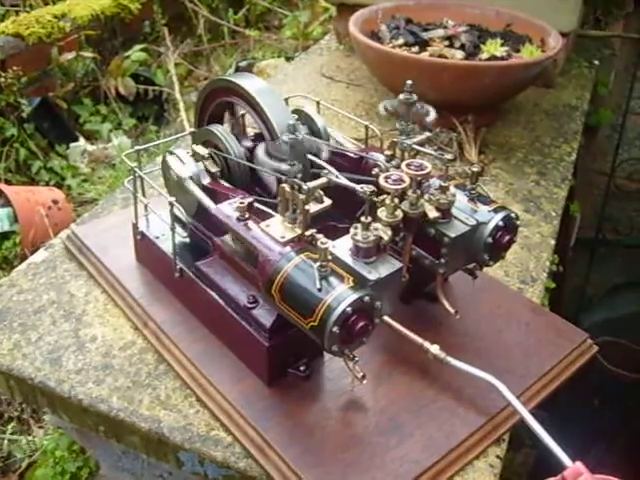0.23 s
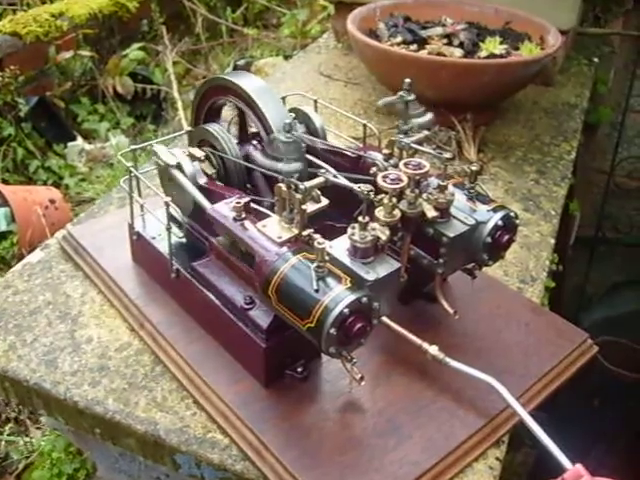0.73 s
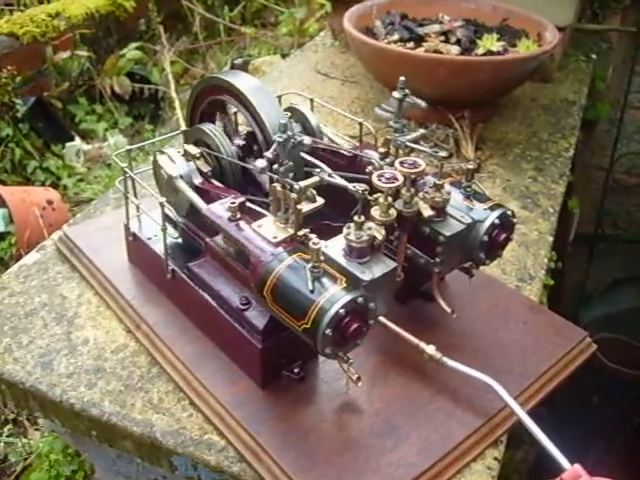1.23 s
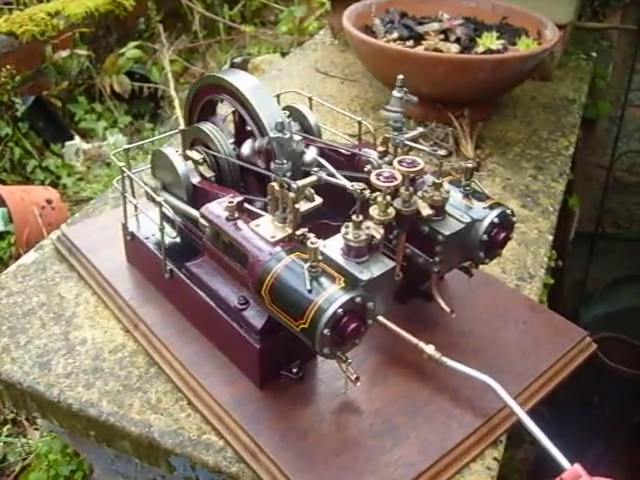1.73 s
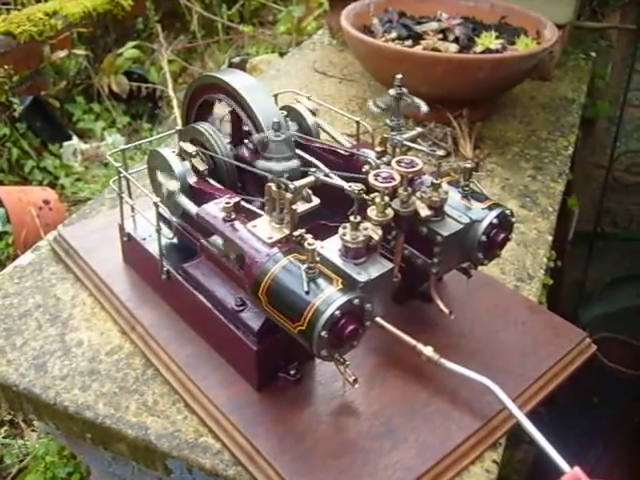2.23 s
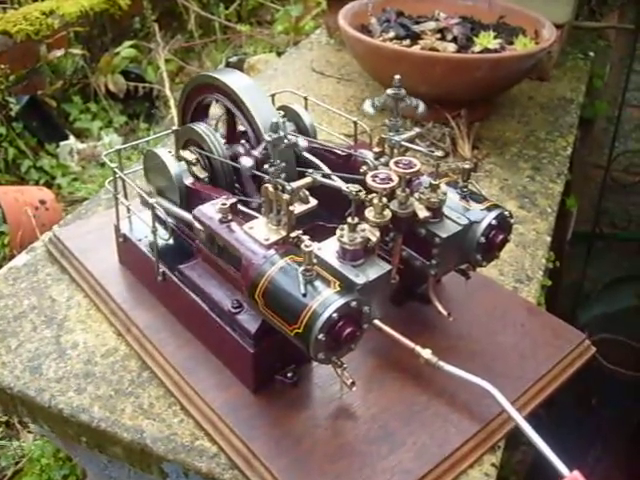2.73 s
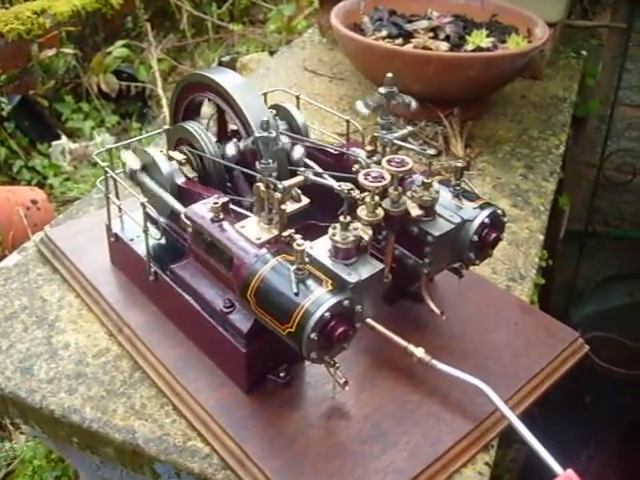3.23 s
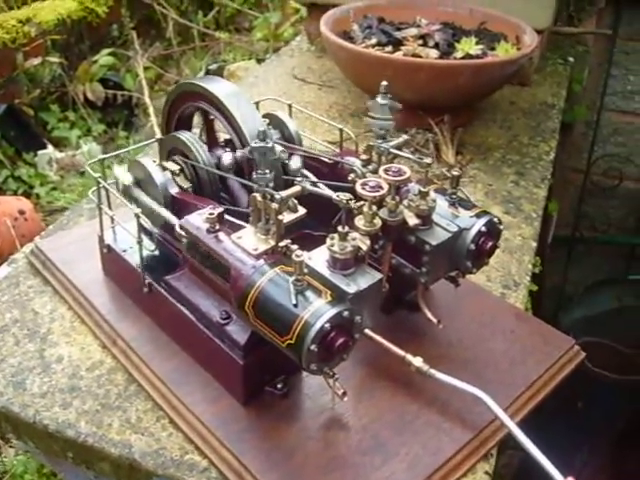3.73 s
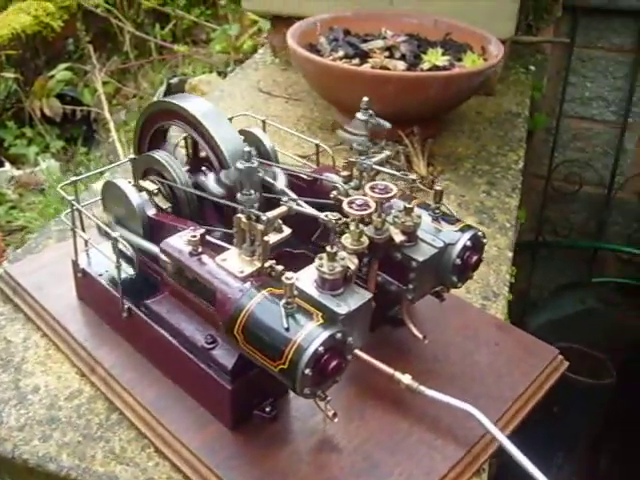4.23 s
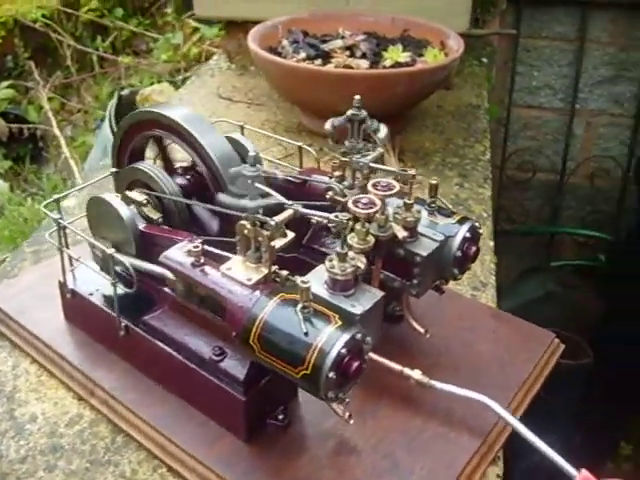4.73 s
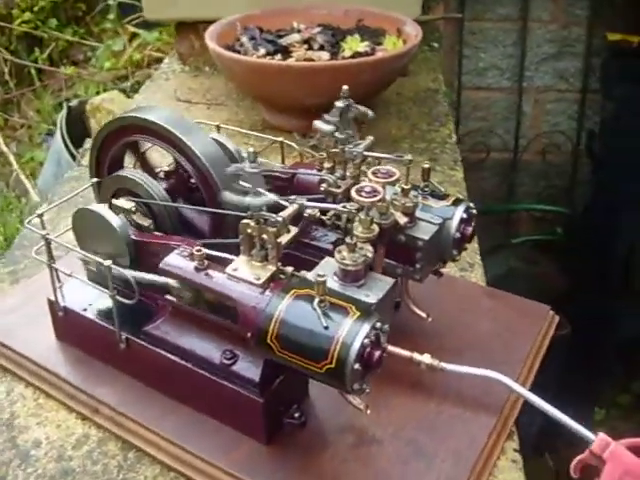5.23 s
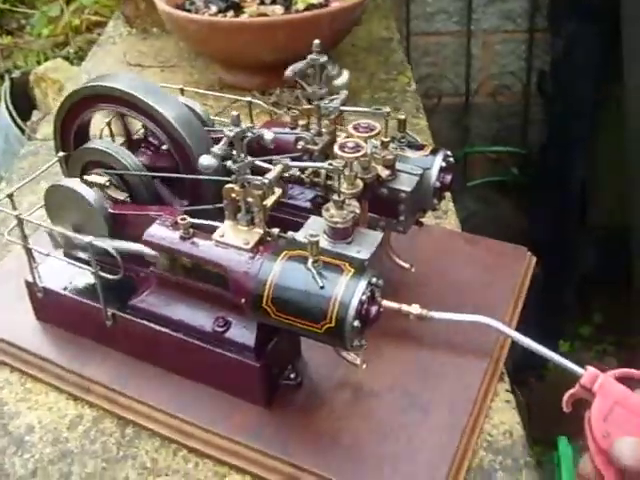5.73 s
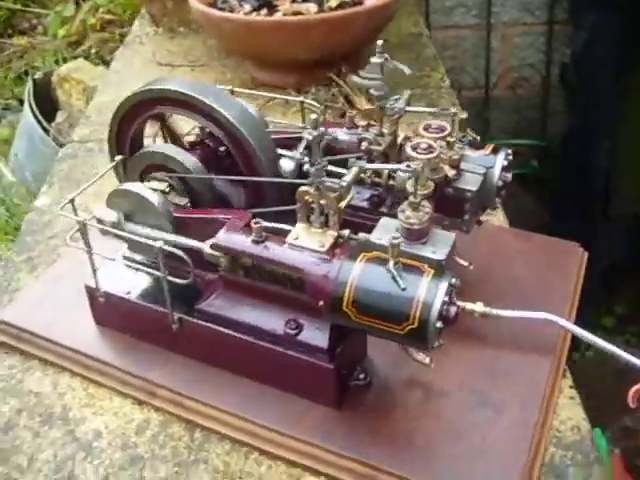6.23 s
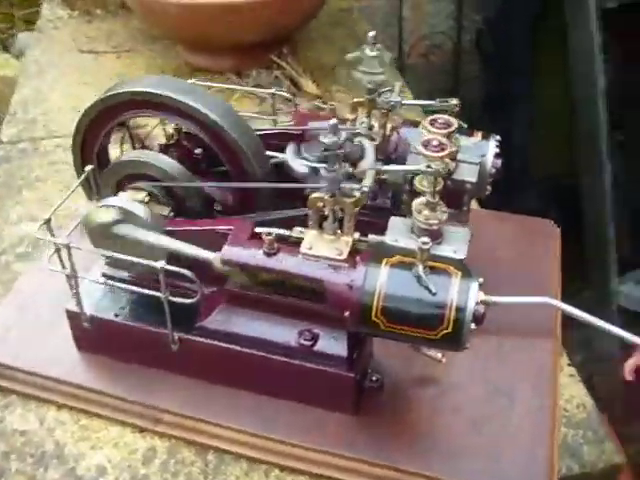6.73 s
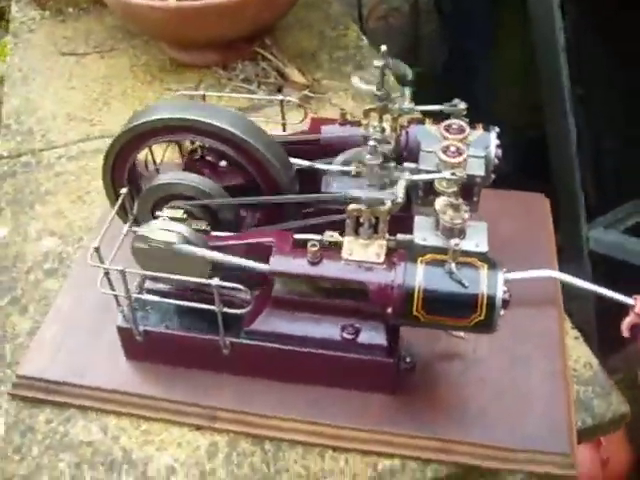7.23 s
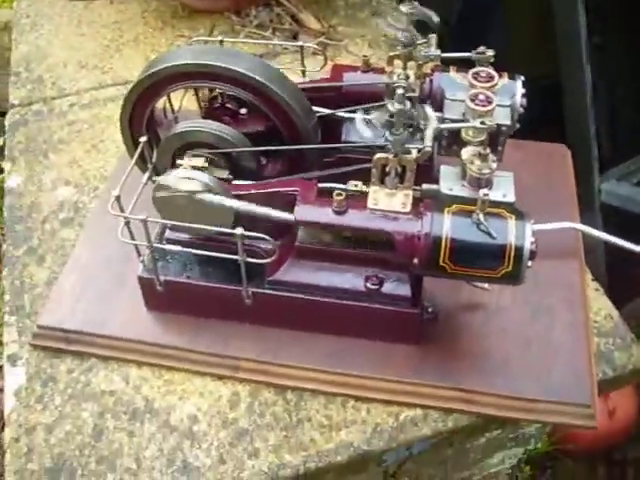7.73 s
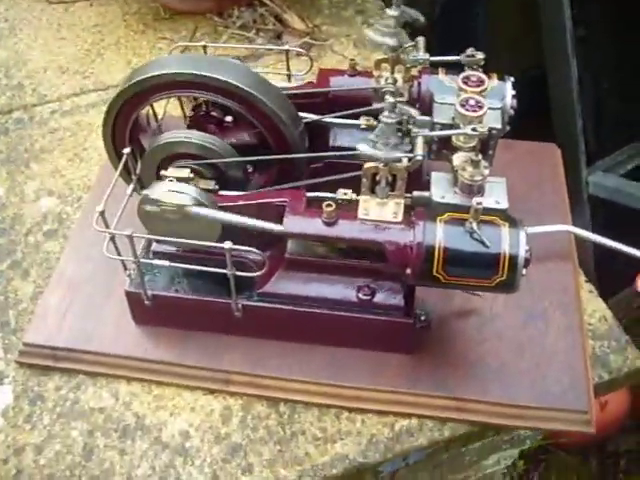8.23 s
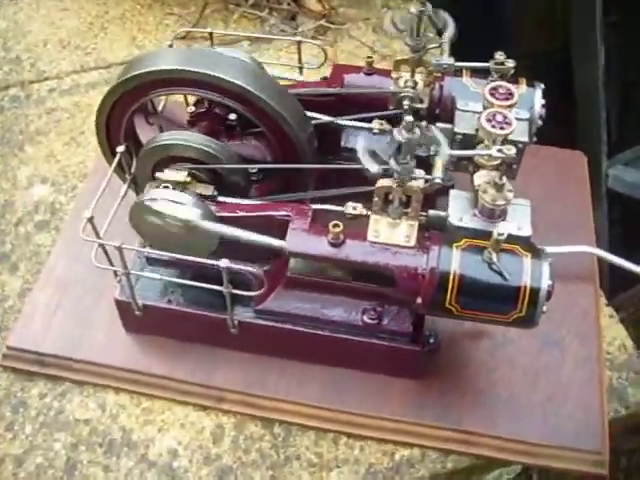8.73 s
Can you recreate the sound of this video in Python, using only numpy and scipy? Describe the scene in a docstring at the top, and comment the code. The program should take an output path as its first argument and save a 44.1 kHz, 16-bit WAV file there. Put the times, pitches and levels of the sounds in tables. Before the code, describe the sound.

Constant bright air leak and a fast, even, mechanical chuff in a garden. Puffs alternate strong and weak, mixed with clacks, small thuds and ticking knocks, all very short and dry. The beat sags to about five a second near two seconds, then picks up. A faint low drone swells midway. From six seconds, heard from the side, the clacks are duller and the hiss less piercing.

```python
"""A twin-cylinder model steam engine runs on compressed air on a garden slab, about six turns a second.
Soft outdoor rumble and leaking air, both shaped noise, are there from the start. Turn after turn, we hear a puff,
a thud, a knock with a steel tick, two faint thuds, then a bigger puff with a sharp clack: blows ring sines.
The engine slows after a second and recovers; a low drone, a plain sine, swells between three and five seconds.
From about six seconds the microphone is mostly round at the side, no longer facing the cylinder ends."""
import sys
import numpy as np
from scipy import signal
from scipy.fft import rfft, irfft, next_fast_len
from scipy.io import wavfile

SR = 44100
rng = np.random.default_rng(int(sys.argv[2]) if len(sys.argv) > 2 else 0)


def master(y):
    """Save y as 16-bit WAV."""
    cut = np.clip(np.atleast_2d(y).T, -1, 1)
    pcm = np.round(cut * 32767)  # scale
    wavfile.write(sys.argv[1], SR, pcm.astype(np.int16))


N = 396459
TIME = np.arange(N) / SR


def from_db(db):
    """Decibels to gain."""
    return 10 ** (np.asarray(db) / 20)


def in_time(rows):
    """Each column of a table of moments, read at every sample."""
    seconds, *columns = np.transpose(rows)
    return [np.interp(TIME, seconds, column) for column in columns]


def over_turn(rows, angle):
    """Each column of a one-turn table, read at the given crank angles."""
    share, *columns = np.transpose(rows)
    return [np.interp(angle, share, column) for column in columns]


def coloured(hz, level_db):
    """Noise with the given loudness in dB per Hz, fading below the lowest pitch listed."""
    size = next_fast_len(N, True)
    bins = np.maximum(np.arange(size // 2 + 1) * SR / size, 1)
    gain = from_db(np.interp(np.log(bins), np.log(hz), level_db))
    gain *= np.minimum(bins / hz[0], 1) ** 2
    noise = irfft(rfft(rng.standard_normal(size)) * gain, size)[:N]
    return noise * np.sqrt(SR / 2)


# The crank speed times every blow and puff. Each row: time in seconds, turns a minute.
CRANK_SPEED = [(0, 372.8), (.49, 378.6), (1.09, 346.5), (1.41, 295.4), (1.8, 285.6), (2.07, 291.5),
               (2.5, 315.2), (2.78, 317.4), (3.11, 347.6), (3.42, 364.2), (4.01, 378.6), (5.08, 362.5),
               (5.48, 350.9), (6.1, 342), (6.65, 338.9), (7.04, 353.8), (7.48, 362), (8.99, 349.9)]
# Turns are counted from the first clack; the beat skips ahead once near the start.
FIRST_CLACK_S = .1158
SKIP_S, SKIP_TURNS = .095, .14


def crank_turns():
    """Adding up the speed gives the turns made since the first clack, at every sample."""
    turns = np.cumsum(in_time(CRANK_SPEED)[0]) / (60 * SR)
    turns += SKIP_TURNS * (TIME > SKIP_S)
    return turns - np.interp(FIRST_CLACK_S, TIME, turns)


def passes(share):
    """The moments in seconds at which the crank passes a given share of its turn."""
    return TIME[1:][np.diff(np.floor(crank_turns() - share)) > 0]


# The outdoor background. Each row: pitch in Hz, loudness in dB per Hz.
GARDEN_NOISE = [(20, -93), (40, -87.5), (70, -85.5), (105, -90.5), (140, -84), (200, -84.5), (290, -86.5),
                (370, -92), (520, -80.5), (900, -100), (4000, -120)]


def garden_rumble():
    """Soft outdoor rumble: steady noise, strongest in the low pitches."""
    return coloured(*np.transpose(GARDEN_NOISE))


# How hard the air is fed. Each row: time in seconds, exhaust level in dB, leak level in dB.
AIR_SUPPLY = [(0, -0.5, 1), (.8, 0, 0.5), (1.3, -2.5, -1.5), (1.9, -2, -1.5), (2.5, -1.5, -1),
              (3.2, -1, 0.5), (4, 0, 0.5), (4.7, -0.5, 0), (5.7, -2, 0), (6.3, -2, 0), (7, -0.5, 0.5),
              (8.99, -1, 0.5)]


def air_supply():
    """The slow changes of exhaust and leak level, in dB."""
    return in_time(AIR_SUPPLY)


def jet(spectrum, flow_db, side):
    """Turbulent air through a port; it flutters, and its colour depends on the side it is heard from."""
    hz, front_db, side_db = np.transpose(spectrum)
    front_hiss = np.sqrt(1 - side) * coloured(hz, front_db)
    side_hiss = np.sqrt(side) * coloured(hz, side_db)
    # one random value about every 128 samples
    eddies = np.interp(TIME, np.linspace(0, TIME[-1], N // 128), rng.standard_normal(N // 128))
    return (front_hiss + side_hiss) * from_db(flow_db + 1.63 * eddies)


def brighten(x, top_db):
    """Raise or lower the highest hiss, above 7540 Hz."""
    top = signal.sosfiltfilt(signal.butter(4, 7540, "high", fs=SR, output="sos"), x)
    return x + (from_db(top_db) - 1) * top


# The colour of the leak, before its flow sets the level.
# Each row: pitch in Hz, dB per Hz from the front, dB per Hz from the side.
LEAK_COLOUR = [(354, -38, -39.5), (550, -24.5, -27), (1600, -17.5, -21), (2280, -24.5, -21.5),
               (2350, -20.5, -19.5), (3240, -18, -23), (4230, -6.5, -14), (5100, -13.5, -18),
               (5760, -8.5, -13), (7500, -10.5, -21.5), (7500, -15.5, -17), (8660, -15, -16),
               (10380, -11.6, -18.6), (12040, -32.5, -36)]
# How the leak changes over one turn. Each row: share of the turn, level in dB, extra top hiss in dB.
LEAK_OVER_TURN = [(0, 3, -5.5), (.1, 2.5, 1), (.15, -0.5, 2), (.18, -1, 6), (.23, -0.5, 3), (.35, 1, 1),
                  (.46, 2.5, -.5), (.56, 1.7, -4.5), (.7, -2.5, -0.5), (.725, 1.3, -.5), (.78, -.3, 0),
                  (.86, 1.2, 2.3), (.94, 2.7, 0), (1, 4.5, -1.5)]


def valve_leak(side):
    """Air leaks past the valves all the while, stronger and brighter at some crank angles."""
    gap_db, gap_top_db = over_turn(LEAK_OVER_TURN, crank_turns() % 1)
    leak_db = air_supply()[1]
    return brighten(jet(LEAK_COLOUR, leak_db + gap_db - 61.0, side), gap_top_db)


def puff(shape):
    """Flow in dB through an exhaust port: it opens quickly, holds, then dies away as the cylinder empties."""
    opens, opening, hold, fall_db, level_db = shape
    since = (crank_turns() - opens) % 1
    gap = np.clip(since / opening, 1e-3, 1)
    dying = np.maximum(since - opening - hold, 0)
    return level_db + 40 * np.log10(gap) - fall_db * dying


# The colour of the second puff, before its flow sets the level.
# Each row: pitch in Hz, dB per Hz from the front, dB per Hz from the side.
SECOND_COLOUR = [(305, -24, -21), (503, -16, -12), (1470, -11, -14), (2120, -15.5, -12), (3080, -9, -14.5),
                 (4130, 0.4, -6.9), (5300, -13.5, -14.5), (6040, 0.6, -7.5), (8150, -13, -9.5),
                 (9040, -2, -5), (9770, -0.5, -12.5), (12200, -25, -25)]
# The single row: port opens at, opening time and hold as shares of the turn, fall in dB per turn, level in dB.
SECOND_FLOW = (.228, .014, .028, 230, -59.5)


def second_exhaust(side):
    """A puff of air rushes out of the second port about a quarter turn after the clack."""
    return jet(SECOND_COLOUR, air_supply()[0] + puff(SECOND_FLOW), side)


def ring(force, hz, t60):
    """A unit click sets a sine of height 1 ringing; it falls 60 dB in t60 seconds."""
    r, w = from_db(-60 / (t60 * SR)), 2 * np.pi * hz / SR
    return signal.lfilter([0, np.sin(w)], [1, -2 * r * np.cos(w), r * r], force + 1e-18)


# strength of the part of the chatter that differs from turn to turn
LOOSENESS = 0.52


def blows(times, level_db, modes, side, chatter_db, chatter_s, rise_t60):
    """Slack parts meet with a click and chatter briefly, much alike on every turn; the same modes answer."""
    clicks = np.zeros(N)
    clicks[np.clip(np.round(times * SR).astype(int), 0, N - 1)] = from_db(level_db)
    t = np.arange(SR // 20) / SR
    fade = np.exp(-t / chatter_s)
    fade *= from_db(chatter_db) / np.linalg.norm(fade)
    # the contact is spread in time but holds all pitches evenly
    contact = rfft((t == 0) + fade * rng.standard_normal(len(t)))
    contact = irfft(contact / np.abs(contact))[:len(t) // 2]
    loose = np.abs(signal.oaconvolve(clicks, fade)[:N]) * rng.standard_normal(N)
    force = signal.oaconvolve(clicks, contact)[:N] + LOOSENESS * loose
    out = np.zeros(N)
    for k, (hz, front_db, side_db, t60) in enumerate(modes):
        drive = (-1) ** k * force * from_db(front_db + side * (side_db - front_db))
        # the ring swells for a moment as the blow spreads through the frame
        out += ring(drive, hz, t60) - ring(drive, hz, 1 / (1 / t60 + 1 / rise_t60))
    return out


# The push of the pistons sags as the engine slows. Each row: time in seconds, push in dB.
PISTON_PUSH = [(0, -.6), (1, -1.1), (1.36, -6.2), (2.15, -6.2), (2.42, -3.2), (3.1, -1), (3.9, .7),
               (5.7, .5), (6.4, -1), (7, 0), (8.3, -.4), (8.99, .8)]
# chance difference between one blow and the next
SCATTER_DB = .4


def strokes(share, lag_s, force, side):
    """Time and level of a once-a-turn blow; a part crosses its slack (the lag), then strikes with the push."""
    front_db, side_db, follows = force
    times = passes(share) + lag_s
    level_db = front_db + side * (side_db - front_db) + follows * in_time(PISTON_PUSH)[0]
    return times, np.interp(times, TIME, level_db) + SCATTER_DB * rng.standard_normal(len(times))


# What the first rod's thud rings with.
# Each row: pitch in Hz, dB from the front, dB from the side, time to fall 60 dB in seconds.
THUD_RINGS = [(526, -5.5, -1.5, 0.028), (694, 8, 9.5, 0.02), (843, 9, 6.5, .02), (1108, -2.5, 7.5, 0.032),
              (1420, -0.5, 2.5, 0.033), (1554, 12.5, 11, 0.015), (1786, 1, 9, 0.02), (4220, -6, -10, .012)]
# The single row: dB from the front, dB from the side, share of the push that it follows.
THUD_STRENGTH = (-30.2, -33.4, .7)


def rod_thud(side):
    """The load reverses on the first rod, and its slack bearing thuds."""
    times, level_db = strokes(.295, .0036, THUD_STRENGTH, side)
    return blows(times, level_db, THUD_RINGS, side, chatter_db=-5.5, chatter_s=0.0057, rise_t60=0.012)


# the share of the turn where the load reverses on the second rod
KNOCK_AT = .448
# What the second rod's knock rings with.
# Each row: pitch in Hz, dB from the front, dB from the side, time to fall 60 dB in seconds.
KNOCK_RINGS = [(500, -4, -3.5, 0.028), (820, 5.5, 6.5, 0.011), (1053, 1.5, -2.5, 0.024),
               (1308, 11.5, 12.5, 0.024), (1493, 14.5, 13, 0.0095), (2520, 4, 4, 0.01)]
# The single row: dB from the front, dB from the side, share of the push that it follows.
KNOCK_STRENGTH = (-26.6, -26, 1.2)


def rod_knock(side):
    """The load reverses on the second rod, which knocks the bed."""
    times, level_db = strokes(KNOCK_AT, .0058, KNOCK_STRENGTH, side)
    return blows(times, level_db, KNOCK_RINGS, side, chatter_db=-8.0, chatter_s=.005, rise_t60=0.018)


# What the steel tick rings with.
# Each row: pitch in Hz, dB from the front, dB from the side, time to fall 60 dB in seconds.
TICK_RINGS = [(3940, 1, 6.5, 0.0036), (4550, -2.5, -6.5, 0.014), (5050, 1, 7, 0.0049), (5780, 5, 5, 0.0058),
              (6100, 5.5, 2.5, 0.0081), (7240, -13, -5, 0.0059), (9200, -5, 2, 0.0036)]
# The single row: dB from the front, dB from the side, share of the push that it follows.
TICK_STRENGTH = (-17.3, -20.2, .7)


def steel_tick(side):
    """A short, high steel tick comes with the second rod's knock."""
    times, level_db = strokes(KNOCK_AT, .0057, TICK_STRENGTH, side)
    return blows(times, level_db, TICK_RINGS, side, chatter_db=-7.0, chatter_s=0.0024, rise_t60=0.0011)


# The load reverses twice on the first rod's way back. The two values are shares of the turn.
RETURNS_AT = (.758, .793)


def return_thuds(side):
    """The first rod thuds faintly twice on its way back, ringing with the same pitches as its main thud."""
    times = np.concatenate([passes(share) for share in RETURNS_AT])
    return blows(times, -52.5, THUD_RINGS, side, chatter_db=-5.0, chatter_s=0.0026, rise_t60=0.0056)


# The colour of the main puff, before its flow sets the level.
# Each row: pitch in Hz, dB per Hz from the front, dB per Hz from the side.
MAIN_COLOUR = [(307, -32.5, -41.5), (500, -16, -17.4), (1010, -10, -7.0), (1710, -7, -9.6),
               (2080, -10, -9.5), (2780, -20, -14), (3030, -8, -14.5), (4270, -6, -4.5), (5240, -5, -8.5),
               (5760, 0.6, -5.5), (7630, -6.5, -13), (8500, -7, -3), (10250, -1.5, -7), (12200, -22, -22)]
# The single row: port opens at, opening time and hold as shares of the turn, fall in dB per turn, level in dB.
MAIN_FLOW = (-.008, .018, .038, 280, -58.3)


def main_exhaust(side):
    """The main puff of air rushes out of its port, which opens just before the clack."""
    return jet(MAIN_COLOUR, air_supply()[0] + puff(MAIN_FLOW), side)


# What the clack rings with.
# Each row: pitch in Hz, dB from the front, dB from the side, time to fall 60 dB in seconds.
CLACK_RINGS = [(687, -21, -16.5, 0.015), (1023, -26, -18, 0.023), (1370, -16.5, -19, 0.024),
               (1698, -15, -7, 0.023), (2433, -13.5, -4.5, 0.012), (2726, -13, -4, 0.015),
               (3450, -4, 1, 0.0082), (4460, 5.5, 0, 0.012), (5120, -3, -3.5, 0.016), (5980, 2, 0.5, .011),
               (7040, -1, -5, 0.011), (8540, -8, -1, .01)]
# The single row: dB from the front, dB from the side, share of the push that it follows.
CLACK_STRENGTH = (-13.6, -21.7, .3)


def valve_clack(side):
    """The valve gear gives a sharp metal clack as each turn begins."""
    times, level_db = strokes(0, 0, CLACK_STRENGTH, side)
    return blows(times, level_db, CLACK_RINGS, side, chatter_db=-0.5, chatter_s=0.0033, rise_t60=.003)


# The level of the far-off drone. Each row: time in seconds, level in dB.
DRONE_LEVEL = [(0, -77), (2.55, -77), (3, -66), (3.5, -68), (3.75, -62), (4.35, -61), (5.05, -77),
               (8.99, -78)]


def far_drone():
    """A low, far-off drone, a sine of 57.3 Hz, swells and fades."""
    return np.sqrt(2) * np.sin(2 * np.pi * 57.3 * TIME) * from_db(in_time(DRONE_LEVEL)[0])


# The resonances of ports and pipes. Each row: pitch in Hz, width in Hz, then plain gains:
# from the front, from the side, at the pipe mouth.
PORT_TONES = [(1710, 70, 0, 0.082, .8), (2550, 180, 0.066, .2, 0.58), (4160, 230, 0.42, -0.049, 0.12),
              (6070, 280, 0.26, .25, -0.23), (7140, 280, 0.4, 0, .1), (8840, 450, 0, 0.49, -0.023),
              (10200, 360, 0.37, -0.047, -0.064)]


def air(side, top_db, pipe_share):
    """All the air noise; the top hiss is beamed, and the pipe tones stand out as the pipe mouth passes."""
    hiss = main_exhaust(side) + second_exhaust(side) + valve_leak(side)
    pipes = np.zeros(N)
    for hz, width, front, beside, mouth in PORT_TONES:
        tone = signal.lfilter(*signal.iirpeak(hz, hz / width, fs=SR), hiss)
        pipes += tone * (front + side * (beside - front) + pipe_share * mouth)
    return brighten(0.91 * hiss + pipes, top_db)


def linkage(side):
    """All the blows of the moving parts."""
    rods = rod_thud(side) + return_thuds(side) + rod_knock(side) + steel_tick(side)
    return valve_clack(side) + rods


def surroundings(x, wet_db, t60):
    """Slab, pots and fence scatter each blow into a short tail, alike on every turn."""
    t = np.arange(SR // 8) / SR
    echoes = rng.standard_normal(len(t)) * from_db(-60 * t / t60) * (t > .004)
    tail = signal.fftconvolve(x, echoes / np.linalg.norm(echoes))[:N]
    return x + from_db(wet_db) * tail


# The path of the microphone. Each row: time in seconds, place from 0 (front) to 1 (side),
# gain of the beamed top hiss in dB, nearness to the pipe mouth (no unit).
MICROPHONE_PATH = [(0, 0.075, -2, -1), (2.5, 0.11, -1, 0), (4.3, 0.096, -0.5, 0.075), (5, 0.21, -1, 1.2),
                   (5.75, 0.32, -3, 1), (6.15, 0.84, -2, 0.6), (6.5, 0.88, -2, 0.65), (6.9, 0.95, -1, 0),
                   (8.99, 1, 0, 0.53)]


def scene():
    """The engine in the garden, heard from the moving microphone."""
    side, top_db, pipe_share = in_time(MICROPHONE_PATH)
    side = np.clip(side, 0, 1)
    blows_heard = surroundings(linkage(side), wet_db=-18.5, t60=0.057)
    background = garden_rumble() + far_drone()
    return (blows_heard + air(side, top_db, pipe_share) + background)[None]


def record(dry):
    """The recorder cuts the top steeply above 12150 Hz."""
    return signal.sosfilt(signal.ellip(10, .2, 70, 12150, fs=SR, output="sos"), dry)


dry = scene()
out = record(dry)
master(out)
```